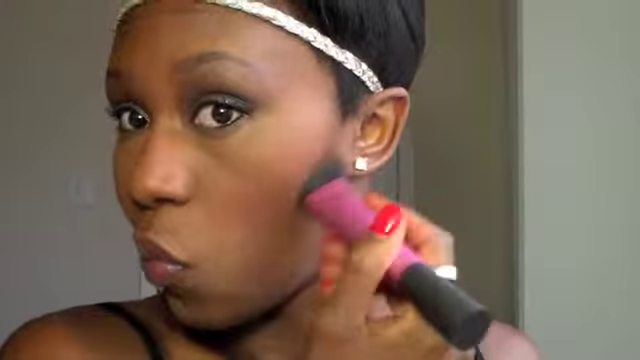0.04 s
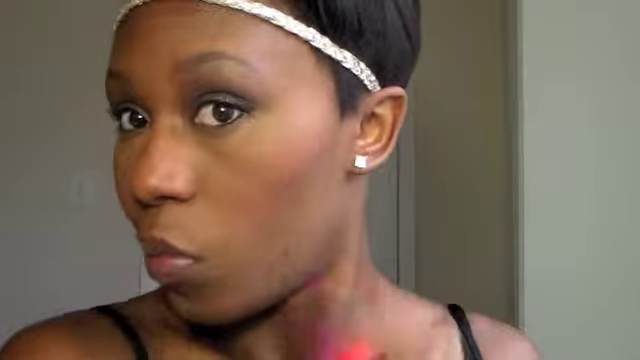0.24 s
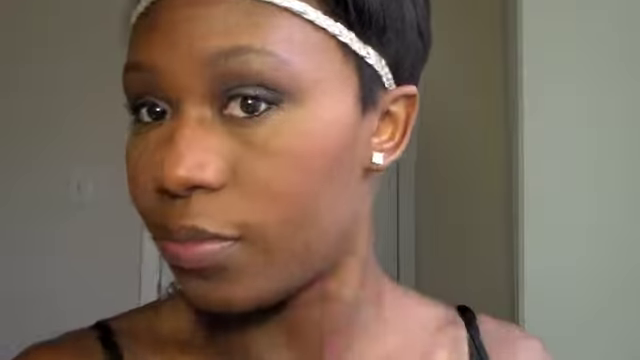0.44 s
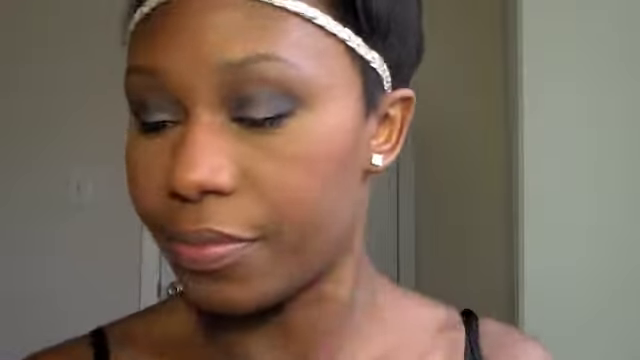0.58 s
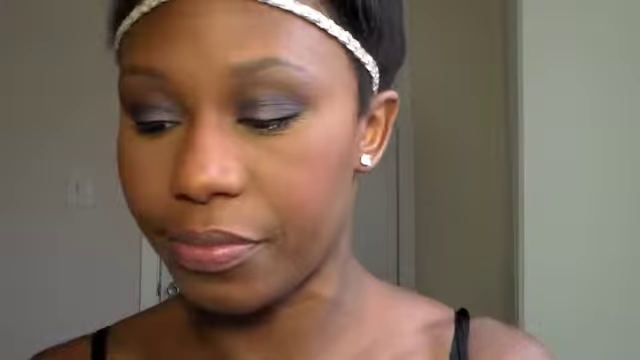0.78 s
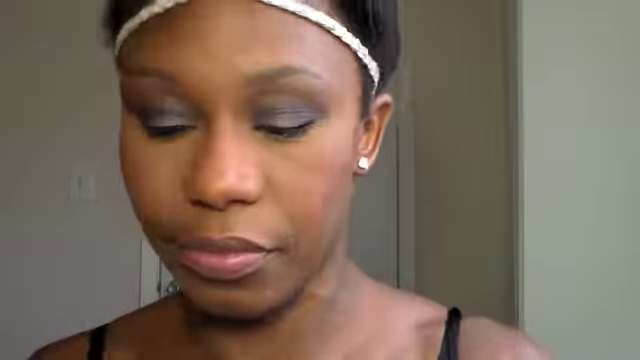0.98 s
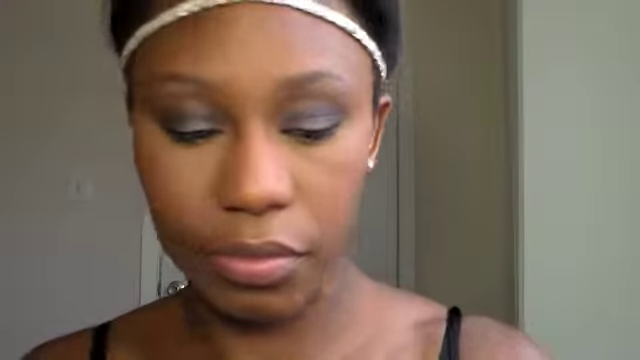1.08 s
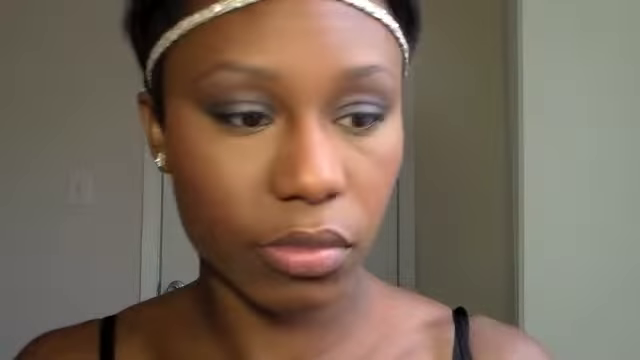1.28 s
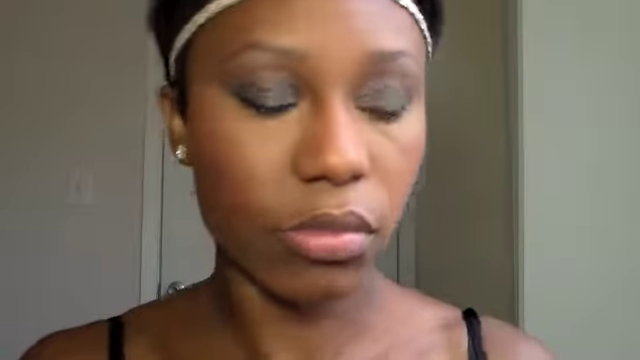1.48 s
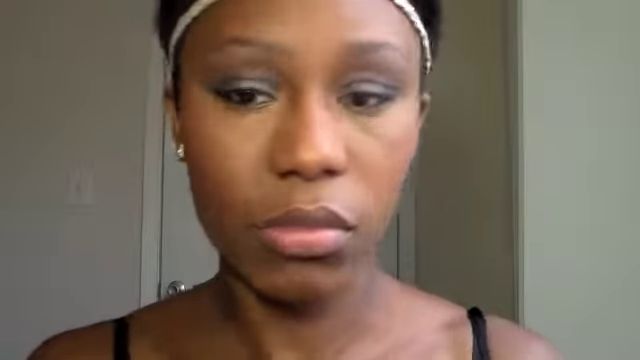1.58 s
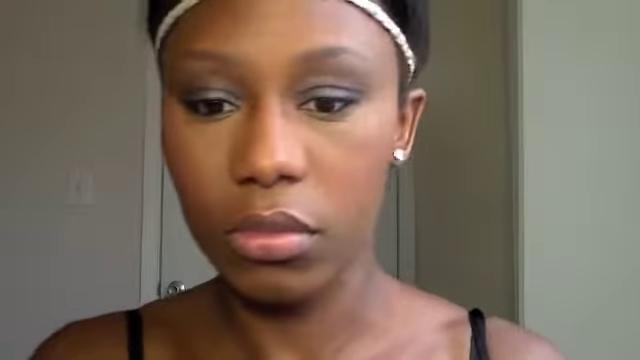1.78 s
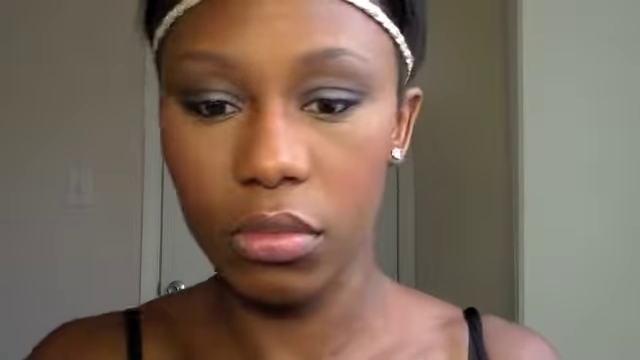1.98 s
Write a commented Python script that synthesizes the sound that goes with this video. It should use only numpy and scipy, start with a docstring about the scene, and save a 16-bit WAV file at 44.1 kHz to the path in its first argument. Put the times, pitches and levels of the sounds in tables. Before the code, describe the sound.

Small plastic makeup cases are handled close to the microphone in a small room. Faint ticks lead to a few clacks and a sharp snap, then an item rattles onto a table, knocks again and slides slightly.

```python
"""Makeup cases on a table

Small plastic cases are handled in a small room, close to a microphone with two sound openings.
Faint ticks lead to a few clacks and a sharp snap; then an item rattles down on the tabletop,
knocks once more and slides a little. Each hit is a short crack plus the ringing of what was struck.
Room noise and electrical hum lie underneath; they dip after the snap and creep back."""
import sys
import numpy as np
from scipy import signal
from scipy.fft import rfft, irfft
from scipy.io import wavfile

SR = 44100
rng = np.random.default_rng(int(sys.argv[2]) if len(sys.argv) > 2 else 0)


def int16_out(signal):
    """Quantize to a 16-bit WAV file."""
    q = np.round(np.clip(np.atleast_2d(signal).T, -1, 1) * 32767)
    wavfile.write(sys.argv[1], SR, q.astype(np.int16))


N = 90052

CASE_LAG_S = 0.000022  # sound from the cases reaches the right opening this much later


def undb(db):
    """Turn decibels into a number to multiply by."""
    return 10 ** (np.asarray(db) / 20)


def unit(x):
    """Scale a sound so that its energy is 1."""
    return x / np.sqrt(np.sum(x ** 2))


def shape(x, gain):
    """Multiply each frequency f in a sound by gain(f)."""
    size = 2 * x.shape[-1]
    f = np.fft.rfftfreq(size, 1 / SR) + 1
    return irfft(rfft(x, size) * gain(f), size)[..., :size // 2]


def colour(x, points):
    """Change the tone along a curve of (frequency_hz, gain_db) points."""
    hz, db = np.array(points).T
    return shape(x, lambda f: undb(np.interp(np.log(f), np.log(hz), db)))


def lowpass(x, hz, order=2):
    """Dull a sound by turning down everything above hz."""
    return signal.sosfilt(signal.butter(order, min(hz, SR / 2 - 1), fs=SR, output="sos"), x)


def fade(fade_s):
    """A half-second curve that falls by 60 dB every fade_s seconds."""
    return np.exp(-np.log(1000) * np.arange(SR // 2) / SR / fade_s)


def ring(tones):
    """A struck object rings with several dying tones; every other pair starts upside down."""
    t = np.arange(SR // 2) / SR
    return unit(sum((-1) ** (k // 2) * undb(db) * unit(np.sin(2 * np.pi * hz * t) * fade(fade_s))
                    for k, (hz, db, fade_s) in enumerate(tones)))


def add(out, start_s, x):
    """Mix x into out, beginning at start_s."""
    i = int(start_s * SR)
    out[i:i + len(x)] += x[:N - i]


def diffuse(size, apart_hz=7900):
    """Noise from all around: alike at both openings in the bass, unrelated above about apart_hz."""
    common, opposite = rng.standard_normal((2, size))
    apart = lambda f: np.clip(0.023 + f ** 2 / (f ** 2 + apart_hz ** 2), 0, .5)
    common = shape(common, lambda f: np.sqrt(1 - apart(f)))
    opposite = shape(opposite, lambda f: np.sqrt(apart(f)))
    return np.array([common + opposite, common - opposite])


def in_room(x, send, lag_s, echo_s=0.0085, echo_db=-12, build_up_s=0.003):
    """x arrives directly, lag_s later on the right, and off the nearest wall; send fills the room."""
    # the room's lingering sound, band by band: centre_hz, level_db, fade_s
    bands = [(150, 10, 0.19), (422, -15, 1), (930, 6, 0.45), (2520, 1, 0.42), (5700, 3.5, 0.37),
             (13500, 4, 0.33)]
    near = np.array([x, shape(x, lambda f: np.exp(-2j * np.pi * f * lag_s))])
    treble = x - lowpass(x, hz=1780, order=1)
    for channel, smear in zip(near, diffuse(SR // 2) * fade(0.023)):
        add(channel, echo_s, undb(echo_db) * signal.fftconvolve(treble, unit(smear)))
    noise = diffuse(SR // 2)
    centres = np.log([row[0] for row in bands])
    tail = sum(undb(db) * fade(fade_s) * shape(noise, lambda f: np.interp(np.log(f), centres, band))
               for band, (_, db, fade_s) in zip(np.eye(len(bands)), bands))
    build_up = 1 - np.exp(-(np.arange(SR // 2) / SR / build_up_s) ** 2)
    tail = unit(tail * build_up) * np.sqrt(2)
    return near + signal.fftconvolve(send[None], tail)[:, :N]


def background(air_db=-47, hiss_db=-65, hum_waver=0.3, bass_hz=306):
    """Room noise and wavering electrical hum dip and return, the bass last, over a steady thin hiss."""
    # tone of the room noise: frequency_hz, gain_db
    air_tone = [(20, 0), (28, -6), (40, -16), (60, -3), (90, -3.5), (130, -1.5), (280, -11.5), (570, -11),
                (760, -17), (1400, -20), (1900, -23.5), (2600, -27.5), (3700, -30.5), (13400, -36),
                (15000, -44)]
    # narrow resonances in the room noise: pitch_hz, width_hz, lift_db
    air_peaks = [(579, 19, 5), (1430, 120, 3.5), (2530, 89, 5)]
    # tones of the electrical hum: pitch_hz, level_db
    hum_tones = [(29, -54), (58.3, -48), (116.5, -51.5)]
    # how noise and hum rise and fall: time_s, bass_gain_db, rest_gain_db
    gains = [(0, -0.5, 1.5), (1.0, .5, 3), (1.15, -6, 4), (1.18, -17, -8), (1.33, -20.5, -17.5),
             (1.47, -15, -15), (1.62, -9, 11.5), (1.76, -14.5, 1.5), (1.84, -8.5, 1.5), (1.91, -3.5, 2),
             (2.04, -6, 1)]
    t = np.arange(N) / SR
    air = colour(diffuse(N), air_tone)
    lift_db = lambda f: sum(db / (1 + (2 * (f - hz) / width) ** 2) for hz, width, db in air_peaks)
    air = shape(air, lambda f: undb(lift_db(f)))
    air *= undb(air_db) / air.std()
    for hz, db in hum_tones:
        drift = shape(rng.standard_normal(N), lambda f: np.exp(-f / 6))
        waver = 1 + hum_waver * drift / drift.std()
        air += undb(db) * np.sqrt(2) * waver * np.sin(2 * np.pi * (hz * t + rng.random()))
    times, bass_db, rest_db = np.array(gains).T
    bass = shape(air, lambda f: 1 / (1 + (f / bass_hz) ** 4))
    rest = (air - bass) * undb(np.interp(t, times, rest_db))
    return bass * undb(np.interp(t, times, bass_db)) + rest + undb(hiss_db) * diffuse(N)


def handling_ticks(ring_s=0.011, scuff_s=0.016, scuff_db_per_octave=-7.5, room_db=-12.5):
    """Faint handling ticks, the loudest followed by its quick echo: each is two tones and a scuff."""
    # handling ticks and, at 0.269 s, the echo of the loudest:
    # start_s, level_db, low_pitch_hz, high_pitch_hz, high_gain_db, scuff_gain_db, scuff_hz
    ticks_and_echo = [(0.1594, -24.5, 1960, 2680, 3, 3.5, 3560), (0.2585, -12.5, 2160, 7050, 5.5, -8, 6560),
                      (0.2690, -24.5, 2200, 7100, -5, -1, 8500), (0.4160, -36, 4500, 7000, -3, 4.5, 5500),
                      (0.5208, -30.5, 4440, 7000, 0, -3, 6500),
                      (0.8097, -23.5, 1730, 3900, -7.5, 1.5, 2900),
                      (0.8380, -28.5, 1410, 3600, -7, 1.5, 3000)]
    out = np.zeros(N)
    for start_s, db, low_hz, high_hz, high_db, scuff_db, scuff_hz in ticks_and_echo:
        noise = rng.standard_normal(SR // 2)
        scuff = shape(noise, lambda f: undb(scuff_db_per_octave * abs(np.log2(f / scuff_hz))))
        tone = ring([(low_hz, 0, ring_s), (high_hz, high_db, ring_s * .5)])
        add(out, start_s, undb(db) * (tone + undb(scuff_db) * unit(scuff * fade(scuff_s))))
    return in_room(out, undb(room_db) * out, CASE_LAG_S)


def crack(tone_curve, spread_s=0.000518, spread_hz=6370):
    """The click of contact. It travels as a bend in the object, which carries treble sooner than bass."""
    hz, db = np.array(tone_curve).T
    f = np.fft.rfftfreq(SR // 2, 1 / SR) + 1
    # these three steps pack the energy at the start of the click without changing its tone
    cepstrum = irfft(np.log(undb(np.interp(np.log(f), np.log(hz), db))))
    cepstrum[1:] *= 2
    cepstrum[len(cepstrum) // 2:] = 0
    delay_cycles = spread_s * spread_hz * (1 - np.exp(-f / spread_hz))
    click = irfft(np.exp(rfft(cepstrum) - 2j * np.pi * delay_cycles))
    return unit(click * np.linspace(1, 0, SR // 2))


def hits(events, tones, crack_tone, scatter_s, scatter_db, bass_hz, lag_s):
    """Each hit cracks and rings, and nearby things scatter its sound; softer contact rings duller."""
    out, send = np.zeros((2, N))
    ringing, contact = ring(tones), crack(crack_tone)
    bass = lowpass(ringing, bass_hz, order=1)
    low_cut = signal.butter(2, 168, "high", fs=SR, output="sos")  # small things give off little bass
    for start_s, db, bright_hz, bass_db, crack_db, room_db in events:
        body = lowpass(ringing + (undb(bass_db) - 1) * bass, bright_hz)
        hit = signal.sosfilt(low_cut, undb(db) * (body + undb(crack_db) * contact))
        tiny_echoes = unit(rng.standard_normal(SR // 2) * fade(scatter_s))
        scatter = signal.fftconvolve(hit, tiny_echoes)[:len(hit)]
        add(out, start_s, hit + undb(scatter_db) * scatter)
        add(send, start_s, undb(room_db) * hit)
    return in_room(out, send, lag_s)


def case_clacks():
    """Plastic cases meet in a few clacks; the last, nearly all crack, is the sharp snap."""
    # the clacks: start_s, level_db, brightness_hz, bass_gain_db, crack_gain_db, room_gain_db
    clacks = [(1.0220, -1, 2220, -3.5, -9, 2), (1.0237, 0.5, 1800, 6.5, -31, -18),
              (1.0436, 2.5, 6260, 3.5, -7.5, -14), (1.1368, -8, 3500, 2.5, -15, -7),
              (1.1617, -6.5, 4200, -30, 11.5, -12.5)]
    # ringing tones of a plastic case: pitch_hz, level_db, fade_s
    tones = [(859, -10, 0.11), (950, -5.5, 0.024), (1150, -6, 0.023), (1315, -22.5, .015),
             (1750, -1.5, 0.0064), (2230, -8, 0.017), (2600, -5.5, 0.0037), (3106, -3.5, .007),
             (4860, 5, 0.012), (6160, 3.5, 0.011), (7400, -3, 0.0033)]
    # tone of the crack on a case: frequency_hz, gain_db
    crack_tone = [(150, -29.5), (500, -19), (1000, -7), (2000, 1), (3200, -1), (5000, -3), (6800, -7),
                  (7800, -5), (10500, -9), (14000, -21.5)]
    return hits(clacks, tones, crack_tone,
                scatter_s=0.019, scatter_db=-4.5, bass_hz=1400, lag_s=CASE_LAG_S)


def table_knocks():
    """An item lands, rocks and knocks once more, making the tabletop ring."""
    # the knocks: start_s, level_db, brightness_hz, bass_gain_db, crack_gain_db, room_gain_db
    knocks = [(1.4935, -3, 3000, -5.5, -1.5, -4), (1.4953, 5, 2300, -2, -13.5, -3),
              (1.4977, -10, 2510, -1.5, -5, 4.5), (1.5068, -7, 1970, -19, -13, -8),
              (1.5108, -16, 6030, -12.5, -7, -17), (1.5187, -13, 5000, -6.5, 6.5, -4.5),
              (1.5218, -3, 1210, -3.5, -4, -6), (1.5248, -4, 2200, 1, -9.5, 4.5),
              (1.6314, 3, 620, -1.5, 0, -8)]
    # ringing tones of the tabletop with the item on it: pitch_hz, level_db, fade_s
    tones = [(197, -5, 0.04), (308, -5.5, 0.042), (401, -0.5, 0.0345), (455, 0.5, .035), (430.7, -10, 0.39),
             (587, -5, 0.32), (652, -9.5, 0.088), (774, -8, 0.62), (1080, -16, 0.019), (1355, -2, .02),
             (1600, -39, 0.3), (1750, -10.5, 0.011), (2562, -6.5, 0.036), (4170, -22, 0.036)]
    # tone of the crack on the table: frequency_hz, gain_db
    crack_tone = [(150, -12), (500, -5.5), (1000, -7.5), (1700, 1), (2500, 1), (3200, -2), (4250, 1),
                  (6000, -9.5), (7700, -11), (10000, -9.5), (14000, -25)]
    return hits(knocks, tones, crack_tone, scatter_s=0.016, scatter_db=-9.5, bass_hz=700, lag_s=0.00004)


def slide(peak_s=1.81, swell_s=0.09, level_db=-53.5, centre_hz=2390):
    """The item slides a little on the table: a faint rub that swells and fades."""
    rub = shape(diffuse(N), lambda f: undb(-7 * np.log2(f / centre_hz) ** 2))
    swell = np.exp(-((np.arange(N) / SR - peak_s) / swell_s) ** 2)
    return undb(level_db) * rub / rub.std() * swell


def scene():
    """Add all the sounds together in stereo."""
    return case_clacks() + table_knocks() + handling_ticks() + slide() + background()


def record(dry, top_hz=14300):
    """The microphone's left opening sounds a little fuller, its right brighter; the top treble is cut."""
    left = colour(dry[0], [(200, 1.0), (2000, -0.84), (5000, -1.93)])
    right = colour(dry[1], [(200, -0.2), (2000, -0.77), (5000, -1.57)])
    top_cut = signal.ellip(8, .2, 70, top_hz, fs=SR, output="sos")
    return signal.sosfilt(top_cut, np.array([left, right]))


dry = scene()
out = record(dry)
int16_out(out)
```